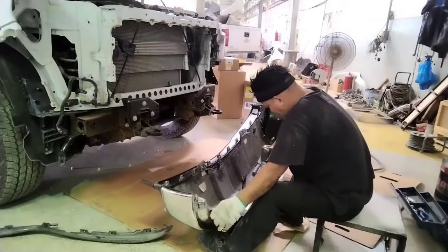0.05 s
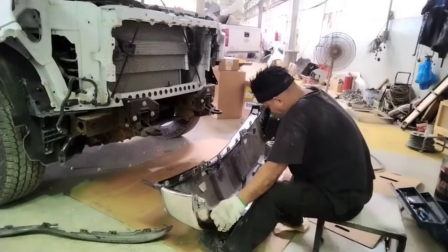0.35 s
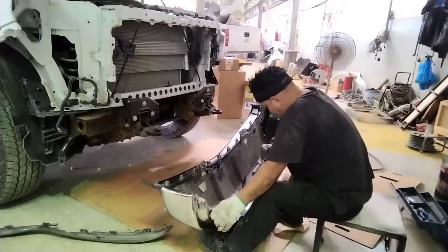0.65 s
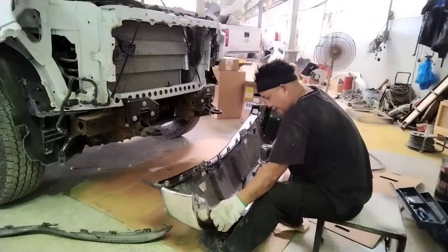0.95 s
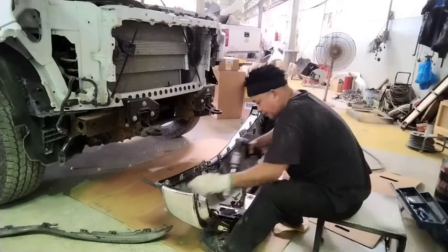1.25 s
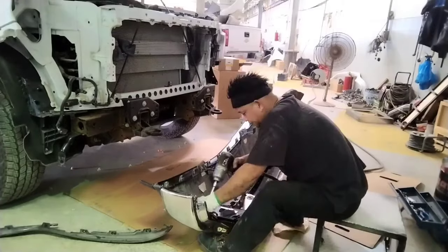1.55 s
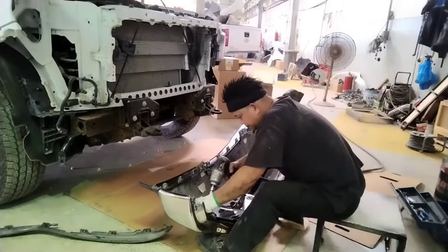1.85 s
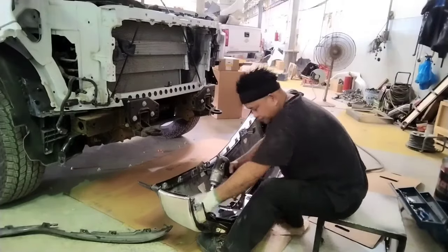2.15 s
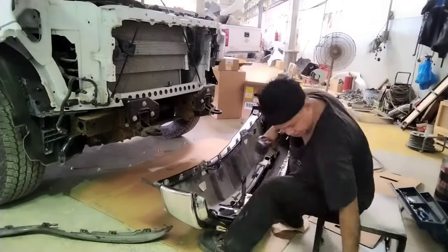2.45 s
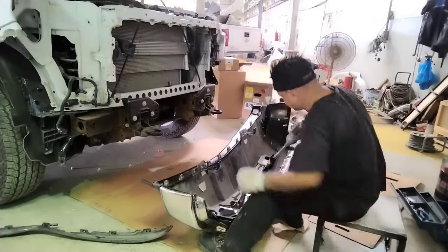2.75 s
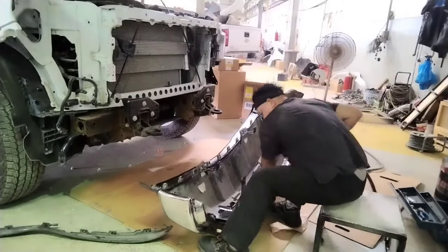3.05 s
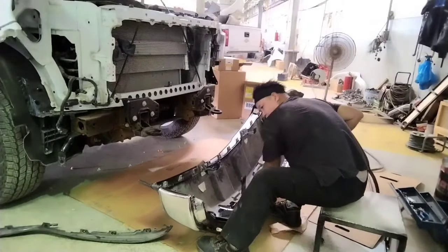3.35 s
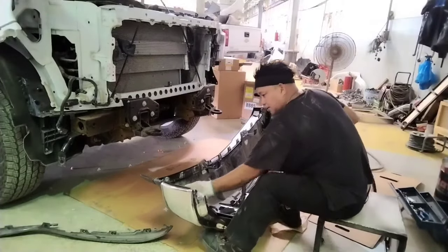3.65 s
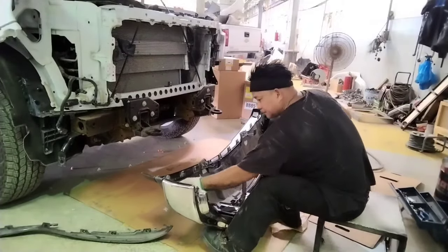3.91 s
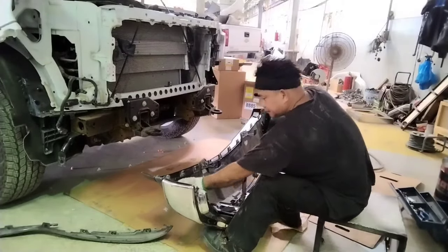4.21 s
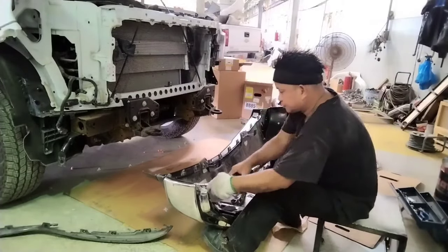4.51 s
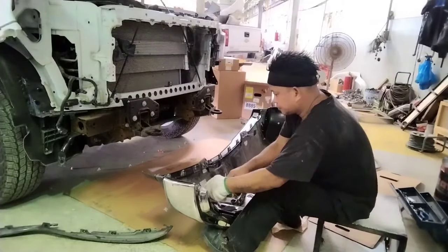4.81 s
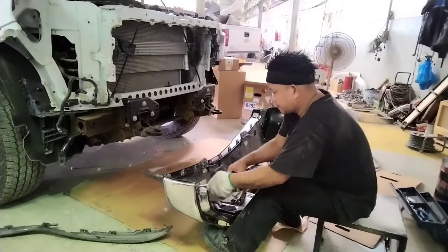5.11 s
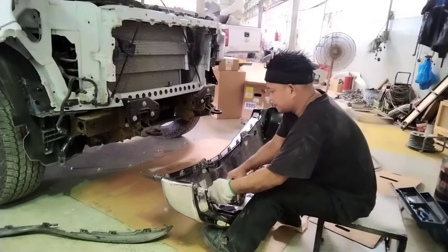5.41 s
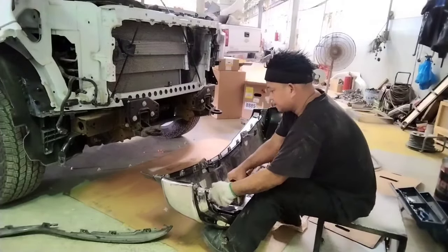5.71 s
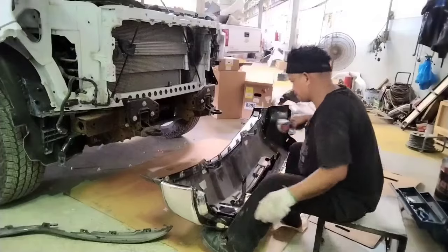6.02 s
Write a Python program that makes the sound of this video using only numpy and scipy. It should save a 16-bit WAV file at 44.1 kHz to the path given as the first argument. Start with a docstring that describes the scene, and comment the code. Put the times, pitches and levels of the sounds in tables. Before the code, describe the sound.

Close by in a faintly humming workshop, an air impact wrench runs twice in stuttering bursts, with a metallic chatter, a bright air hiss and a short squeal at first. The plastic bumper rattles and knocks under it. A pause brings soft cloth rustles, dull microphone bumps, one crisp snap, clinking bolts and a cluster of knocks. Then the wrench hammers once more and winds down.

```python
"""A puff of air dies away over a faint workshop hum; then an air impact wrench runs three bolts out of
a loose plastic car bumper. Its hammer blows and chattering socket excite the modes of the shell while
the exhaust jet hisses; the first bolt squeals by stick-slip friction as it breaks free.
Between runs the tool knocks about, a small part snaps into place, loose bolts clink, clothes rustle
and fingers bump the microphone."""
import sys
import numpy as np
from scipy import signal
from scipy.fft import rfft, irfft, next_fast_len
from scipy.io import wavfile
from scipy.ndimage import uniform_filter1d

SR = 44100
rng = np.random.default_rng(int(sys.argv[2]) if len(sys.argv) > 2 else 0)


def pcm_store(signal):
    """Save signal as 16-bit PCM."""
    levels = np.round(np.clip(np.atleast_2d(signal), -1, 1) * 32767)
    wavfile.write(sys.argv[1], SR, levels.astype(np.int16).T)


N = 272097
TIME_S = np.arange(N) / SR


def from_db(db):
    """Amplitude ratio of a level in decibels."""
    return np.exp(np.asarray(db) * np.log(10) / 20)


def unit_rms(x):
    """Normalisation: the mean of the two channels gets rms 1."""
    return x / np.sqrt(np.mean(x.mean(0) ** 2) + 1e-20)


def in_time(rows):
    """Linear interpolation of each column of a curve to every sample."""
    times_s, *columns = np.transpose(rows)
    return [np.interp(TIME_S, times_s, column) for column in columns]


def at_hz(points, hz):
    """Interpolation of a spectrum on a log-frequency axis."""
    points_hz, values = np.transpose(points)
    return np.interp(np.log(hz + 1e-3), np.log(points_hz), values)


def colour(x, spectrum):
    """Zero-phase filtering by a smooth spectrum."""
    size = next_fast_len(x.shape[-1] + 4096)
    gain = from_db(at_hz(spectrum, np.fft.rfftfreq(size, 1 / SR)))
    return irfft(rfft(x, size) * gain, size)[..., :x.shape[-1]]


def band(x, low_hz, high_hz, order):
    """Causal band-pass filtering."""
    sections = signal.butter(order, [low_hz, min(high_hz, .47 * SR)], "band", fs=SR, output="sos")
    return signal.sosfilt(sections, x + 1e-18)


def resonance(x, hz, width_hz):
    """A damped oscillator: two poles, unit gain at the peak."""
    radius = np.exp(-np.pi * width_hz / SR)
    feedback = [1, -2 * radius * np.cos(2 * np.pi * hz / SR), radius ** 2]
    return signal.lfilter(np.array([1, 0, -1]) * (1 - radius ** 2) / 2, feedback, x + 1e-18)


def drift(per_s):
    """Slow random modulation with a spread of about 1."""
    knots = rng.standard_normal(8192)
    return np.interp(TIME_S * per_s, np.arange(len(knots)), knots)


def envelope(start_s, end_s, rise_s, fall_db_per_s):
    """Linear attack, hold, then exponential decay from end_s."""
    fall_db = np.minimum(fall_db_per_s * np.maximum(TIME_S - end_s, 0), 200)
    return np.clip((TIME_S - start_s) / rise_s, 0, 1) * from_db(-fall_db)


def steady(x, window_s):
    """Division by the running rms evens out the slow level and keeps the transients."""
    power = uniform_filter1d(x.mean(0) ** 2, size=int(window_s * SR))
    return x / np.sqrt(np.maximum(power, 1e-12))


def wobble(x, depth, per_s):
    """Frequency modulation by a varying delay, as a loose part shifts in its seat."""
    samples = np.arange(x.shape[-1])
    positions = samples + depth * SR / per_s * drift(per_s)[:len(samples)]
    return np.array([np.interp(positions, samples, side) for side in x])


def grains(per_s, spread_db):
    """Shot noise: random clicks of uneven size and sign."""
    clicks = rng.random(N) < per_s / SR
    sizes = from_db(spread_db * np.minimum(rng.exponential(1, N), 4))
    return clicks * sizes * rng.choice([-1, 1], N)


def add_at(out, start_s, sound):
    """Superposition of a short sound on a stereo track."""
    start = int(start_s * SR)
    out[:, start:start + sound.shape[-1]] += sound[:, :N - start]


# Likeness of the sound at the two microphone ports: frequency_hz, correlation
COHERENCE = [(60, .5), (150, .88), (300, .98), (640, .92), (1400, .5), (3000, .15), (7000, .12),
             (15000, .05)]
def diffuse(size):
    """A diffuse field: white stereo noise, coherent in the bass and unrelated in the treble."""
    alike = np.clip(at_hz(COHERENCE, np.fft.rfftfreq(size, 1 / SR)), -1, 1)
    mid, side = rfft(rng.standard_normal((2, size)))
    return irfft(np.sqrt((1 + alike) / 2) * mid + np.sqrt((1 - alike) / 2) * side * [[1], [-1]], size)


def tone_cluster(hz, half_width_hz, size):
    """Narrow-band noise stands for close modes beating around one pitch."""
    noise = band(diffuse(2 * size), hz - half_width_hz, hz + half_width_hz, order=2)
    return steady(noise, window_s=0.069)[:, size:]


def ring_out(x, ring_t60, room_t60, room_db):
    """Convolution with decaying noise: dense short ringing, then the workshop's reverberation."""
    t = TIME_S[:SR // 2]
    decay = from_db(-60 * t / ring_t60) + from_db(room_db - 60 * t / room_t60)
    spectrum = rfft(diffuse(len(t)) * decay)
    power = uniform_filter1d(np.mean(np.abs(spectrum) ** 2, 0), size=60)
    response = irfft(spectrum / np.sqrt(power), len(t))[:, :-2000]
    return signal.fftconvolve(np.atleast_2d(x), response, axes=1)[:, :N]


# Spectrum of the workshop air: frequency_hz, gain_db
AIR_SPECTRUM = [(15, -59), (25, -22), (184, -1), (228, -4), (391, -7.5), (472, -2.5), (767, -16),
                (831, -6.5), (1120, -14), (2580, -16), (3200, -16.5), (3660, -15), (8000, -22),
                (10200, -11), (12300, -5), (15700, -6.5)]
# Tones of a far fan: pitch_hz, level_db
FAN_TONES = [(238, -81), (640, -88), (1062, -84)]
# Slow swells of the background: time_s, air_gain_db, hum_gain_db
SWELLS = [(0.3, -1, -2), (1.5, -2.5, -1), (2.8, 0.5, 3.5), (3.6, 0.5, -1), (4.4, 1, -2.5), (4.8, -6, -8.5),
          (5.1, -2, -4), (6.1, -0.5, -2)]
def background(air_db=-67.5):
    """Ambient noise: broadband air under the phase-modulated hum of a far fan."""
    air_gain_db, hum_gain_db = in_time(SWELLS)
    hum = sum(from_db(db + hum_gain_db) * np.sqrt(2) * np.sin(2 * np.pi * hz * TIME_S + 0.62 * drift(25))
              for hz, db in FAN_TONES)
    return from_db(air_db + air_gain_db) * unit_rms(colour(diffuse(N), AIR_SPECTRUM)) + hum


# Trousers rubbing as the worker shifts on the stool: time_s, level_db
TROUSER_RUB = [(2.4, -120), (2.5, -77), (2.57, -89.5), (2.88, -78), (3.0, -82.5), (3.17, -73),
               (3.21, -87.5), (3.3, -75), (3.6, -74.5), (3.75, -89.5), (3.9, -120)]
def scuff(clump_db=1.5):
    """Friction noise of coarse cloth, in clumps and duller than the sleeves."""
    level_db, = in_time(TROUSER_RUB)
    gain = from_db(level_db + clump_db * drift(68))
    return gain * unit_rms(band(diffuse(N), 1100, 6000, order=2)) * from_db([[-2], [1.5]])


# Spectrum of brushing cloth: frequency_hz, gain_db
CLOTH_SPECTRUM = [(290, -0.5), (500, -9.5), (621, -5.5), (800, -19), (1040, -12.5), (1330, -19),
                  (1910, -15.5), (2800, -22), (3880, -19), (6420, -27), (9900, -14), (12100, 5),
                  (14000, -3), (15700, -8.5)]
# Arm movements that rub the sleeves: start_s, end_s, level_db
ARM_MOVES = [(0.018, 0.254, -66), (1.33, 1.416, -62), (1.585, 1.687, -66), (2.387, 2.468, -61),
             (2.659, 2.888, -60.5), (3.068, 3.168, -61.5), (3.246, 3.396, -51.5), (3.504, 3.582, -57),
             (4.307, 4.42, -59), (4.952, 5.075, -70)]
# Gloves catching and letting go: start_s, level_db
GLOVE_FLICKS = [(0.202, -61), (1.522, -62.5), (2.588, -55.5), (2.765, -53.5), (2.92, -50.5), (3.231, -53),
                (3.466, -54.5), (3.677, -57), (3.9, -48), (6.074, -53.5)]
def rustle(clump_db=4, snap_db=-15, move_rise_s=0.063, flick_rise_s=0.0017):
    """Cloth friction as shot noise in fine clumps; each flick adds a dry broadband snap."""
    moves = sum(from_db(db) * envelope(start_s, end_s, move_rise_s, fall_db_per_s=110)
                for start_s, end_s, db in ARM_MOVES)
    flicks = sum(from_db(db) * envelope(s, s, flick_rise_s, fall_db_per_s=365) for s, db in GLOVE_FLICKS)
    snaps = sum(from_db(db + snap_db) * envelope(s, s, flick_rise_s, fall_db_per_s=900)
                for s, db in GLOVE_FLICKS)
    contacts = grains(600 * from_db(2.5 * drift(30)), spread_db=3.5)
    brush = ring_out(contacts, ring_t60=0.03, room_t60=0.15, room_db=-20.5)
    brush = band(colour(brush, CLOTH_SPECTRUM), 220, 26000, order=2)
    cloth = (moves * from_db(0.5 + clump_db * drift(32)) + flicks) * unit_rms(brush)
    snap_noise = unit_rms(band(diffuse(N), 500, 16300, order=2))
    return (cloth + snaps * snap_noise) * from_db([[-3], [2]])


# Fingers touching the microphone housing: start_s, peak_db, left_minus_right_db
FINGER_BUMPS = [(0.228, -65, 11), (0.597, -53.5, 17), (1.639, -64.5, 15), (1.722, -44.5, 20),
                (2.359, -45, 8), (2.484, -54.5, 24.5), (2.756, -54, -17), (2.962, -48, 26.5),
                (2.985, -52.5, 20), (3.042, -48.5, 14), (3.121, -40.5, 25), (3.15, -42.5, 17.5),
                (3.258, -36, 31), (3.282, -39.5, 23), (3.329, -40.5, 29), (3.477, -41, 4.5),
                (3.534, -45.5, -39), (3.563, -34.5, -24), (3.595, -49, -10), (4.255, -46.5, 9),
                (4.349, -48.5, 21)]
def bumps(thud_hz=180, width_hz=80, rub_s=0.02, rub_db=-24):
    """Structure-borne sound: a push and a brief rub cross the housing, mostly to the nearer port."""
    out, t = np.zeros((2, N)), TIME_S[:SR // 5]
    for start_s, peak_db, pan_db in FINGER_BUMPS:
        touch = (t == 0) + from_db(rub_db) * rng.standard_normal(len(t)) * np.exp(-t / rub_s)
        thud = band(resonance(touch, thud_hz, width_hz), 100, 380, order=3)
        sides = 2 / (1 + from_db([[-pan_db], [pan_db]]))
        add_at(out, start_s, from_db(peak_db) * sides * thud / np.abs(thud).max())
    return out + from_db(-13.5) * band(out, 25, 70, order=1)


# Loose bolts touching in the hand: start_s, low_hz, low_db, high_hz, high_db
BOLT_CLINKS = [(2.683, 1035, -61, 1780, -79), (3.034, 1290, -59, 2980, -61), (3.049, 1492, -59, 2960, -81),
               (3.847, 1590, -46, 3790, -47), (3.872, 2230, -58.5, 3820, -50), (3.9, 2140, -59, 3750, -58),
               (3.98, 1484, -67, 2570, -56), (4.66, 2620, -84, 3670, -80), (4.694, 2620, -73.5, 2910, -77),
               (4.729, 2934, -79.5, 3720, -66), (4.869, 2210, -76.5, 3560, -87)]
def clinks(t60=0.092, rise_s=0.0038, half_width_hz=190, tick_db=-8):
    """Free vibration of small steel parts after contact: a faint tick and two short notes."""
    out, t = np.zeros((2, N)), TIME_S[:SR // 5]
    fade = (1 - np.exp(-t / rise_s)) * from_db(-60 * t / t60)
    for start_s, low_hz, low_db, high_hz, high_db in BOLT_CLINKS:
        low = from_db(low_db) * tone_cluster(low_hz, half_width_hz, len(t))
        high = from_db(high_db) * tone_cluster(high_hz, half_width_hz, len(t))
        tick = from_db(high_db + tick_db) * band(diffuse(len(t)), 1100, 21000, order=2)
        add_at(out, start_s, (low + high + tick) * fade)
    return out


# A small hard part snapping into place and bouncing once: time_s, level_db
PART_SNAPS = [(3.313, -20.5), (3.316, -27)]
# Modes of that part: pitch_hz, level_db, t60_s
PART_MODES = [(3420, -56, 0.15), (4470, -51, 0.14), (5780, -52, 0.19), (6480, -44, 0.097),
              (11500, -29, 0.15)]
def clack(snap_t60=0.01, tail_db=-32, tail_t60=0.21):
    """A brief, hard impact is rich in treble: a bright snap, a short ring and a reverberant tail."""
    out, t = np.zeros((2, N)), TIME_S[:SR // 4]
    first_s = PART_SNAPS[0][0]
    snaps = sum((t >= s - first_s) * from_db(db - 60 * np.abs(t - s + first_s) / snap_t60)
                for s, db in PART_SNAPS)
    tail = from_db(tail_db - 60 * t / tail_t60)
    bright = unit_rms(band(diffuse(len(t)), 9000, 14500, order=3)) * np.hypot(snaps, tail)
    ring = sum(from_db(db - 60 * t / t60) * tone_cluster(hz, 170, len(t)) for hz, db, t60 in PART_MODES)
    add_at(out, first_s, band(bright + ring, 2900, 18000, order=2))
    return out


# A damped part of the tool dropping against the shell: start_s, strength_db
TOOL_DROPS = [(4.275, -35.5), (5.986, -28.5)]
# Modes that the drop excites: pitch_hz, relative_db
DROP_MODES = [(872, -1), (1150, -6), (1497, 3), (1760, 4), (2240, 1.5), (2783, -7.5), (3050, -5)]
def clanks(rise_s=0.0014, hold_s=0.013, fall_db_per_s=720, top_hz=3500):
    """Heavy damping stops the modes quickly, leaving a solid knock with no treble."""
    out, t = np.zeros((2, N)), TIME_S[:SR // 8]
    fade = np.minimum(t / rise_s, 1) * from_db(-fall_db_per_s * np.maximum(t - hold_s, 0))
    for start_s, strength_db in TOOL_DROPS:
        ring = unit_rms(sum(from_db(db) * tone_cluster(hz, 110, len(t)) for hz, db in DROP_MODES))
        add_at(out, start_s, from_db(strength_db - 7) * band(ring * fade, 330, top_hz, order=5))
    return out


# Modes of the plastic bumper: pitch_hz, bandwidth_hz, relative_db
SHELL_MODES = [(224, 17, 2.5), (358, 17, -10), (470, 40, -4), (550, 91, -9), (740, 5.7, -16), (971, 24, 1),
               (1310, 10, -7.5), (1790, 39, 3), (1998, 55, 1.5), (2360, 160, -8.5), (2900, 93, -5),
               (3510, 12, -3), (3980, 40, -7.5)]
def shell(x, shift_db=5, shifts_per_s=16):
    """Modal coupling: the bumper's main modes stand out, varying as the contact point moves."""
    return x + sum(from_db(db - 3.5 + shift_db * drift(shifts_per_s)) * resonance(x, hz, width_hz)
                   for hz, width_hz, db in SHELL_MODES)


# Modes of the steel socket and bolt: pitch_hz, relative_db, uncapped_t60_s
SOCKET_MODES = [(1504, -2.5, 0.085), (1782, -4, 0.11), (2160, -11, 0.083), (2620, -11.5, 0.18),
                (3354, -3, 0.027), (3720, -9, 0.095), (3880, -8, 0.05), (4800, -15.5, 0.02),
                (9940, -8.5, 0.0057), (11080, -10, 0.02)]
def socket(x, ring_db, shift_db=4, max_t60=0.1):
    """Lightly damped steel modes of varying strength; bandwidth is inverse to decay time."""
    return sum(from_db(db + ring_db + shift_db * drift(25))
               * resonance(x, hz, np.log(1000) / np.pi / min(t60, max_t60))
               for hz, db, t60 in SOCKET_MODES)


# Tool and socket striking the shell: start_s, strength_db, tilt_db_per_octave, ring_hz, ring_db
TOOL_KNOCKS = [(0.514, -48.5, 5.5, 12440, -48), (0.541, -61.5, 9, 1590, -65), (0.579, -53, 0.5, 4300, -57),
               (0.597, -65, 1, 11000, -56.5), (1.004, -18, -1.5, 3970, -30.5), (1.095, -24.5, 4, 1310, -37),
               (1.211, -19, 1.5, 2560, -32.5), (1.426, -62.5, -9.5, 2880, -61), (1.689, -47, -6, 1050, -43),
               (1.703, -37, -2.5, 2490, -39), (1.724, -27.5, -4.5, 1110, -34), (1.748, -41, -7, 780, -48),
               (1.778, -55, -4, 556, -21), (2.051, -21, 0.5, 3520, -33), (2.072, -20, 0.5, 670, -26),
               (2.108, -33, -1, 1750, -31.5), (2.131, -31, 5, 680, -24), (2.152, -22, -1, 1200, -34),
               (2.177, -23, 3, 680, -20), (2.219, -22, -3, 725, -24), (2.28, -18.5, -6, 750, -21.5),
               (2.28, -33, 4, 1830, -36), (2.765, -71, -1, 646, -58), (3.256, -60, 0, 520, -62),
               (3.335, -53, 1, 590, -35.5), (4.015, -26.5, 1, 2360, -39), (4.037, -32.5, -1, 2360, -37.5),
               (4.055, -24.5, -2, 2260, -35), (4.06, -20.5, 0.5, 3460, -35), (4.074, -27, -3, 3930, -33.5),
               (4.092, -25, -1.5, 1690, -36), (4.096, -29.5, 4.5, 966, -36.5),
               (4.198, -26, -0.5, 1800, -32.5), (4.203, -34, -2, 3960, -32.5),
               (4.206, -27.5, 0.5, 3520, -34), (4.21, -46, 4, 730, -41.5), (4.24, -45, 4.5, 730, -47.5),
               (5.197, -38, -4, 474, -27), (5.215, -44, -18, 740, -23.5), (5.344, -22.5, 3, 510, -31),
               (5.358, -43, -13, 870, -21.5), (5.707, -21.5, 2, 1980, -37), (5.812, -17.5, -6, 2390, -25.5),
               (6.068, -62, 7.5, 2570, -61.5), (6.076, -63, 1, 3630, -62.5)]
# Spectrum of a knock before its tilt: frequency_hz, gain_db
KNOCK_SPECTRUM = [(450, -16.5), (900, -9.5), (1800, -1), (3600, 3.5), (7000, -1.5), (13000, 0.5)]
def knocks(pivot_hz=3000, rise_s=0.0055, crack_t60=0.0097, dense_t60=0.15, cluster_t60=0.13,
           room_t60=0.14, room_db=-8, swell_cycles=0.52):
    """Contact hardness sets the spectral tilt: harder knocks are brighter and crack more sharply."""
    out, t = np.zeros((2, N)), TIME_S[:SR // 3]
    edges_hz = np.geomspace(330, 18000, 8)
    centres_hz = np.sqrt(edges_hz[:-1] * edges_hz[1:])
    rise = 1 - np.exp(-t / rise_s)
    fade = from_db(-60 * t / dense_t60) + from_db(room_db - 60 * t / room_t60)
    for start_s, db, tilt, ring_hz, ring_db in TOOL_KNOCKS:
        gains = from_db(db + at_hz(KNOCK_SPECTRUM, centres_hz) + tilt * np.log2(centres_hz / pivot_hz))
        noises = diffuse(len(t)), diffuse(len(t))   # neighbouring bands are unrelated
        crack = from_db(-12 + 0.87 * tilt - 60 * t / crack_t60)
        dense = sum(gain * band(noises[k % 2] * (rise * fade + crack), *edges_hz[k:k + 2], order=4)
                    for k, gain in enumerate(gains))
        cluster = tone_cluster(ring_hz, 0.015 * ring_hz + 40, len(t))
        swell = 1 - np.exp(-t * ring_hz / swell_cycles)   # low notes build up more slowly
        add_at(out, start_s, dense + cluster * swell * from_db(ring_db - 60 * t / cluster_t60))
    steel = socket(out, ring_db=4.5)
    port_ring = from_db(-11) * resonance(out, hz=11000, width_hz=900)   # the microphone port resonates
    return (from_db(-4) * shell(out) + steel + port_ring) * from_db([[-1.2], [1.2]])


# The rotor coasting after the last bolt: time_s, pitch_hz, level_db
ROTOR_WHIR = [(5.7, 275.8, -47), (5.79, 282.7, -44), (5.85, 287, -39), (5.89, 265.4, -47), (5.94, 295, -53),
              (5.98, 280, -53.5)]
def coast(second_db=3, waver=0.032):
    """Periodic rotation: the freed rotor whirs out on its first two harmonics."""
    pitch_hz, level_db = in_time(ROTOR_WHIR)
    phase = 2 * np.pi * np.cumsum(pitch_hz * (1 + waver * drift(150))) / SR
    sounding = (TIME_S > ROTOR_WHIR[0][0]) & (TIME_S < ROTOR_WHIR[-1][0])
    return sounding * from_db(level_db) * (np.sin(phase) + from_db(second_db) * np.sin(2 * phase))


# The first bolt's thread breaking free: time_s, squeal_hz, squeal_db, groan_hz, groan_db
THREAD_SLIP = [(0.68, 2086, -66.5, 507.3, -57), (0.705, 2136, -37, 487.6, -29),
               (0.755, 2278, -21.5, 488.4, -25.5), (0.79, 2540, -34, 428.6, -29.5),
               (0.85, 2330, -66.5, 432, -24.5), (0.88, 2336, -53, 420, -79)]
def squeal(waver=0.011, upper_ratio=1.22, upper_db=-2, groan_waver=0.14):
    """Stick-slip friction in the thread: two rough high tones over a groan."""
    def tone(hz, db, roughness):
        gain = from_db(db + 2 * drift(200))
        return gain * np.sin(2 * np.pi * np.cumsum(hz * (1 + roughness * drift(400))) / SR)
    squeal_hz, squeal_db, groan_hz, groan_db = in_time(THREAD_SLIP)
    slipping = (TIME_S > THREAD_SLIP[0][0]) & (TIME_S < THREAD_SLIP[-1][0])
    tones = tone(squeal_hz, squeal_db, waver) + tone(squeal_hz * upper_ratio, squeal_db + upper_db, waver)
    ringing = ring_out(tones * slipping, ring_t60=0.0027, room_t60=0.23, room_db=-23)
    return ringing + slipping * tone(groan_hz, groan_db - 3.5, groan_waver)


ENGAGE_S, RELEASE_DB_PER_S = 0.021, 296   # attack and decay of a hammer burst
# The air motor spinning: start_s, stop_s, rattle_db, boom_db, exhaust_db
MOTOR_SPINS = [(-0.05, -0.003, -49.5, -38, -33), (0.673, 1.305, -41.5, -41.5, -35),
               (1.68, 1.793, -43, -60.5, -35), (1.773, 2.376, -46, -42.5, -41.5),
               (5.18, 5.936, -38, -41, -34)]
# The hammer engaging a bolt: start_s, end_s, clatter_db, hollow_db, boom_db, exhaust_db, blows_per_s,
# then three notes, each (pitch_hz, level_db)
HAMMER_BURSTS = [(0.684, 0.801, -28.5, -42.5, -35.5, -25, 66.45, (935, -34.5), (1330, -43.5), (3120, -41)),
                 (0.83, 0.975, -26.5, -35.5, -46, -25, 100.1, (975, -36), (1770, -32.5), (3150, -38.5)),
                 (0.999, 1.015, -32, -32.5, -47, -31, 81.2, (940, -44), (2000, -42.5), (2800, -39)),
                 (1.086, 1.176, -30, -39, -56.5, -27.5, 91.88, (986, -33), (1300, -34), (1720, -32.5)),
                 (1.207, 1.23, -39, -34, -64, -27.5, 61.23, (980, -34), (1400, -39), (3300, -44)),
                 (1.78, 1.855, -28, -32, -40.5, -24, 99.48, (1170, -36), (1980, -40.5), (2330, -33)),
                 (1.858, 2.034, -27, -37, -53.5, -24.5, 99.14, (770, -42.5), (1775, -34), (3520, -39)),
                 (2.041, 2.25, -29.5, -30.5, -42.5, -28.5, 49.73, (700, -42.5), (1760, -32), (3550, -37.5)),
                 (2.268, 2.276, -28, -36.5, -52, -22, 41.67, (1100, -36.5), (1800, -34), (4000, -33)),
                 (5.182, 5.288, -29, -33, -50, -29, 52.96, (436, -41.5), (1960, -36.5), (2450, -36)),
                 (5.343, 5.565, -26.5, -31, -48, -24.5, 86, (1830, -34.5), (2300, -37), (2560, -33.5)),
                 (5.572, 5.8, -27, -37, -56, -24.5, 86.42, (830, -41.5), (2130, -37.5), (3450, -40.5))]
def drive(free_blows_per_s=48.0, spin_up_s=0.044, sag_db_per_s=2.5, bite_s=0.058, bite_db=7):
    """Motor and hammer add in power: gains of clatter, hollow body, boom and exhaust, and blow rate."""
    power, rate = np.zeros((4, N)), np.full(N, free_blows_per_s)
    for start_s, stop_s, rattle_db, boom_db, air_db in MOTOR_SPINS:
        # the rattle dies first; the air bleeds off more slowly
        shake = envelope(start_s, stop_s, spin_up_s, fall_db_per_s=398.5)
        flow = envelope(start_s, stop_s, spin_up_s, fall_db_per_s=288.5)
        power[:3] += (from_db([[rattle_db], [rattle_db - 3.5], [boom_db]]) * shake) ** 2
        power[3] += (from_db(air_db) * flow) ** 2
    for start_s, end_s, clatter_db, hollow_db, boom_db, air_db, blows_per_s, *_ in HAMMER_BURSTS:
        age_s = np.maximum(TIME_S - start_s, 0)
        force = envelope(start_s, end_s, ENGAGE_S, RELEASE_DB_PER_S) * from_db(-sag_db_per_s * age_s)
        bite = 1 / (1 + (age_s / bite_s) ** 4)   # a tight bolt shakes the shell harder at first
        for part, db in enumerate([clatter_db, hollow_db, boom_db + bite_db * bite, air_db]):
            power[part] += (force * from_db(db)) ** 2
        rate[(TIME_S >= start_s) & (TIME_S < end_s)] = blows_per_s
    surge = from_db(0.65 * drift(40))   # the socket grips unevenly
    return *np.sqrt(power) * surge, rate


def burst_notes(struck, burst, width_hz=60, flicker_db=3):
    """Forced resonance: the blows excite three notes while the socket bears on one spot."""
    start_s, end_s = burst[:2]
    span = slice(max(int((start_s - .1) * SR), 0), int((end_s + .25) * SR))
    out, notes = np.zeros((2, N)), 0
    for hz, db in burst[7:]:
        ring = resonance(resonance(struck[:, span], hz, width_hz), hz, 3 * width_hz)
        notes += from_db(db - 2 + flicker_db * drift(45)[span]) * steady(ring, window_s=0.1)
    out[:, span] = wobble(notes, depth=0.009, per_s=60)
    return out * envelope(start_s, end_s, ENGAGE_S, RELEASE_DB_PER_S)


# Sustained tones of the steel socket: pitch_hz, relative_db
SOCKET_TONES = [(2794, -22), (3440, -21), (3968, -18.5), (11080, -18)]
def socket_singing(struck, flicker_db=5.5):
    """Repeated excitation keeps the socket's narrow resonances sounding."""
    return sum(from_db(db + flicker_db * drift(25))
               * steady(resonance(resonance(struck, hz, 35), hz, 120), window_s=0.063)
               for hz, db in SOCKET_TONES)


# Spectrum of the exhaust jet: frequency_hz, gain_db
JET_SPECTRUM = [(4000, -6), (6000, -12), (8000, -5), (9500, -2.5), (11100, 6), (12500, -1), (14000, -0.5),
                (15700, -3.5)]
def exhaust(struck, blow_phase, puff_depth=1.2, puff_fade=7, tick_db=-1, sputter_db=1.3):
    """Turbulent jet noise, amplitude-modulated by a puff at each blow; steel ticks ride on it."""
    puffs = 1 + puff_depth * np.exp(-puff_fade * blow_phase)
    jet = unit_rms(diffuse(N) * puffs) + from_db(tick_db) * unit_rms(struck)
    hiss = steady(colour(band(jet, 4200, 21000, order=3), JET_SPECTRUM), window_s=0.048)
    return from_db(-1.4 + sputter_db * drift(70)) * hiss


def hammer(cycles, blow_db=13, chatter_per_s=700, chatter_fade=0.9):
    """Impulse excitation: one blow a cycle, followed by socket chatter that thins out."""
    blows = (np.diff(np.floor(cycles), prepend=0) > 0) * from_db(blow_db)
    chatter_rate = chatter_per_s * np.exp(-chatter_fade * (cycles % 1))
    struck = 0
    for _ in range(3):   # the wobbling socket touches three spots, each ringing in its own way
        contacts = blows * from_db(2 * drift(150)) + grains(chatter_rate, spread_db=3)
        share = from_db(4 * drift(12))
        struck += share * ring_out(contacts, ring_t60=0.038, room_t60=0.43, room_db=-11)
    return struck


# Spectrum of the running tool on the bumper: frequency_hz, gain_db
RATTLE_SPECTRUM = [(30, -38.5), (60, -30), (100, -28.5), (170, -17.5), (250, -11), (400, -3.5), (600, -6),
                   (800, -1), (1300, -7.5), (1900, -4.5), (2500, -2), (3500, -2.5), (4500, -3), (6000, -7)]
def wrench(jitter=0.2):
    """Forced vibration: the hammer drives socket and shell, which radiate while the exhaust hisses."""
    clatter, hollow, boom, air, blows_per_s = drive()
    cycles = np.cumsum(blows_per_s * (1 + jitter * drift(90))) / SR
    struck = hammer(cycles)
    notes = sum(burst_notes(struck, burst) for burst in HAMMER_BURSTS)
    steel = socket_singing(struck)
    struck = struck + socket(struck, ring_db=-7, shift_db=6.5)
    body = colour(shell(struck), RATTLE_SPECTRUM)
    registers = [(boom * from_db(-1), 28, 550), (hollow * from_db(-0.5), 550, 1300),
                 (clatter * from_db(0.08), 1300, 6200)]
    rattle = sum(gain * steady(band(body, low_hz, high_hz, order=4), window_s=0.13)
                 for gain, low_hz, high_hz in registers)
    hiss = air * exhaust(struck, blow_phase=cycles % 1)
    return rattle + notes + hiss + clatter * wobble(steel, depth=0.005, per_s=30)


def scene():
    """Superposition of all sources at the two microphone ports."""
    tool = wrench() + squeal() + coast()
    impacts = knocks() + clinks() + clanks() + clack()
    return tool + impacts + bumps() + rustle() + scuff() + background()


CEILING, CUTOFF_HZ = 0.42, 15650
# Imbalance of the two microphone ports: frequency_hz, left_minus_right_db
PORT_BALANCE = [(200, 2.5), (450, 1.5), (700, -1), (6000, 0), (9000, -2.5), (10000, -9.5), (11100, -7.5),
                (12200, -7), (13300, -3.5), (15500, 16)]
def record(dry):
    """Each port has its own frequency response; saturation rounds the peaks, a low-pass cuts the top."""
    responses = [[(hz, 10 * np.log10(2 / (1 + 10 ** (side * db / 10)))) for hz, db in PORT_BALANCE]
                 for side in (-1, 1)]
    heard = np.array([colour(channel, response) for channel, response in zip(dry, responses)])
    rounded = heard / (1 + (heard / CEILING) ** 4) ** (1 / 4)
    return signal.sosfilt(signal.ellip(12, .1, 80, CUTOFF_HZ, fs=SR, output="sos"), rounded)


dry = scene()
out = record(dry)
pcm_store(out)
```